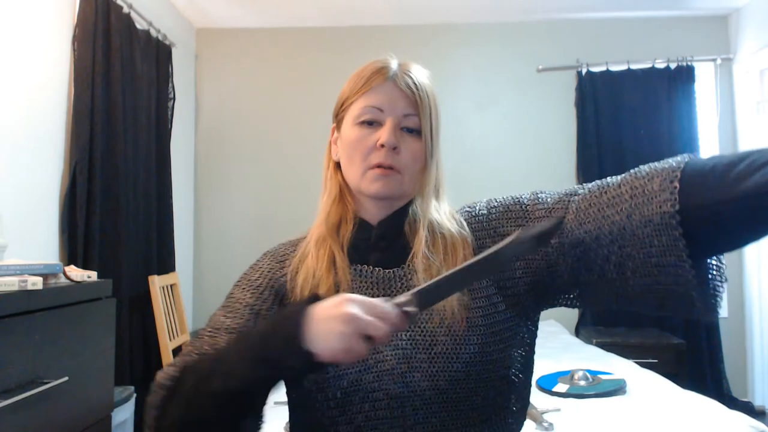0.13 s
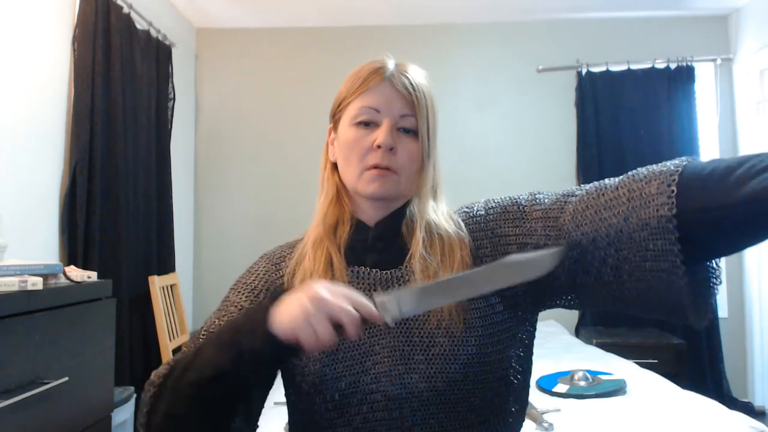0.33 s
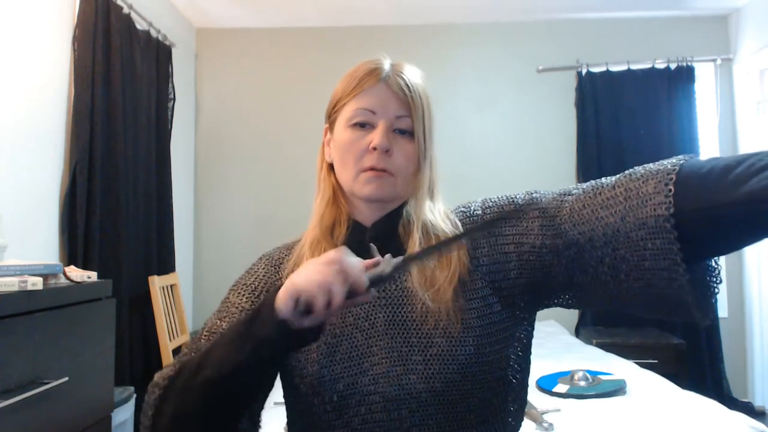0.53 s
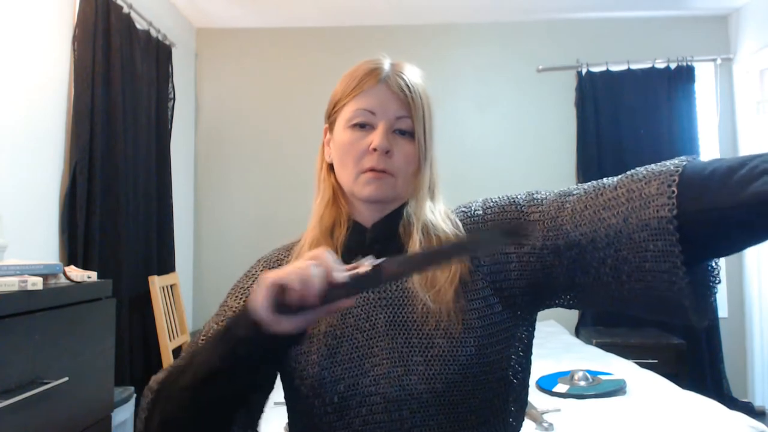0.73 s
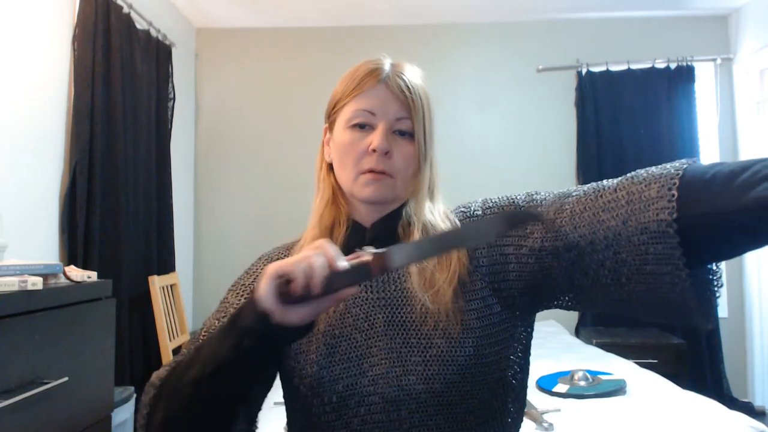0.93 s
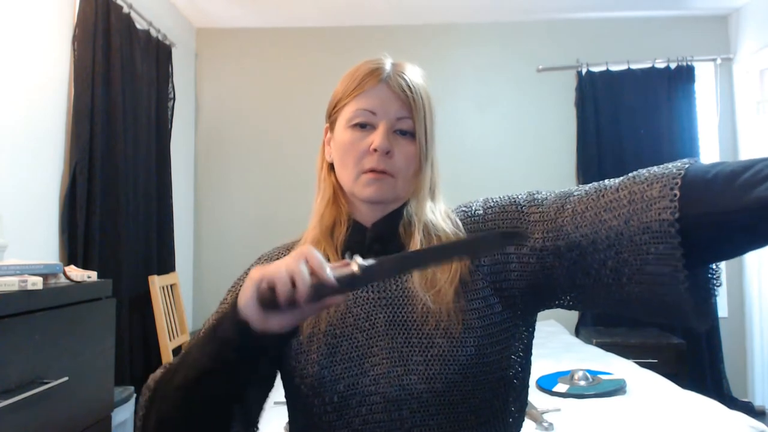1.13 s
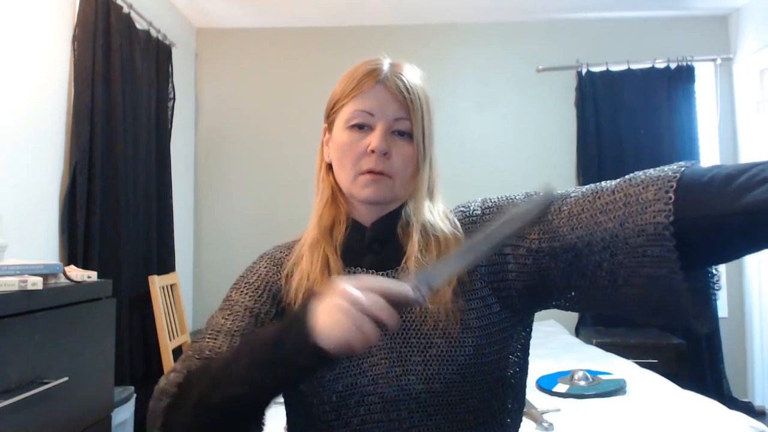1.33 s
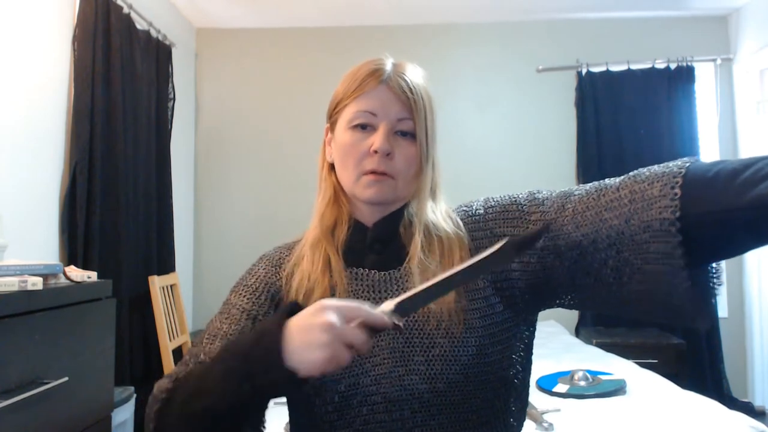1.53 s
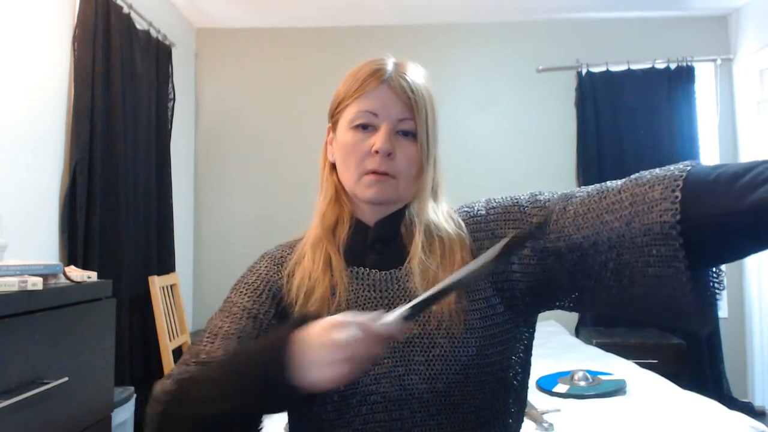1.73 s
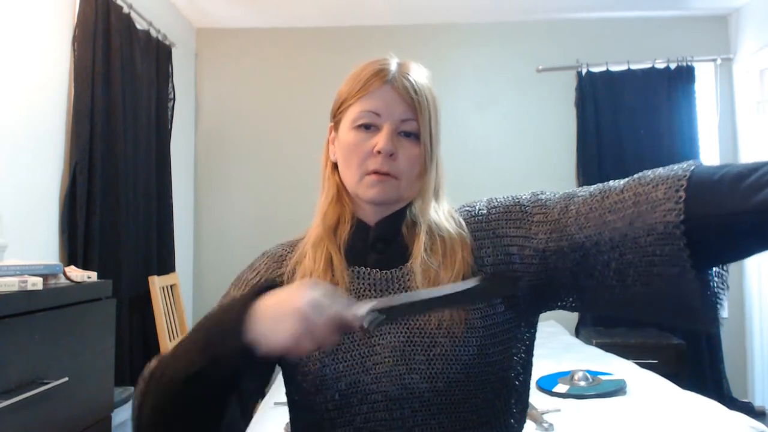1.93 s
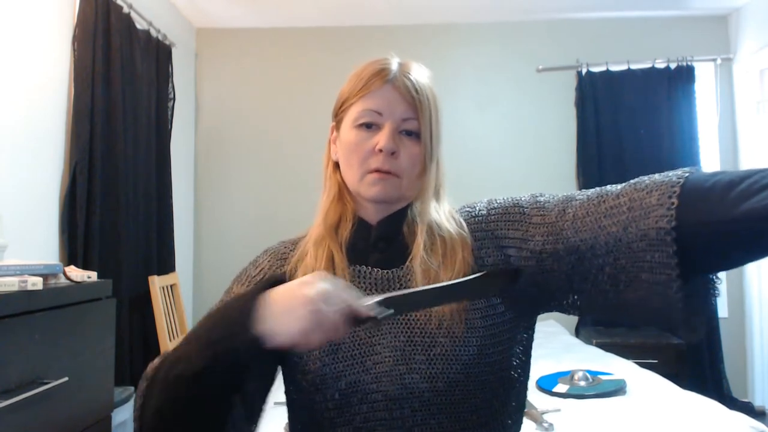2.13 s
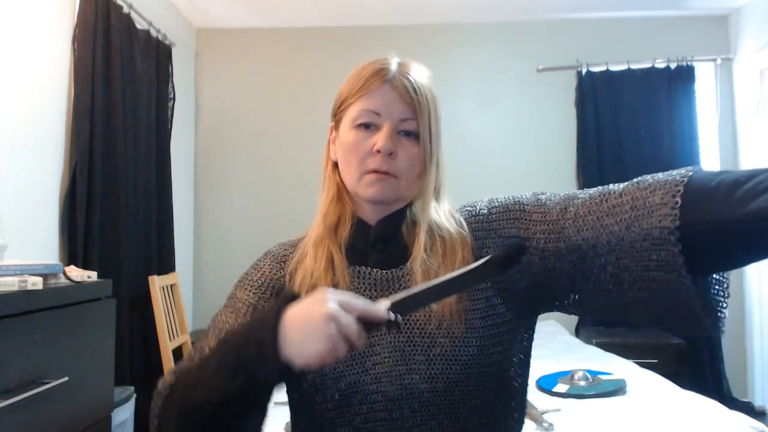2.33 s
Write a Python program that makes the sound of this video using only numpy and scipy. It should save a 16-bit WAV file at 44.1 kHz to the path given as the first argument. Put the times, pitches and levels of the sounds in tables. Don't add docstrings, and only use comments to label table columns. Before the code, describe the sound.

Repeated metallic scrapes of a blade over a chainmail sleeve, each beginning with a sharp clink and rasping over the rings, separated by short pauses; little bass, soft room echoes and low steady hum, small webcam microphone.

```python
import sys
import numpy as np
from scipy import signal
from scipy.fft import rfft, irfft
from scipy.io import wavfile

SR = 44100
rng = np.random.default_rng(int(sys.argv[2]) if len(sys.argv) > 2 else 0)


def master_out(mix):
    frames = np.transpose(np.atleast_2d(mix))
    ceiling = np.clip(frames, -1, 1)
    pcm = np.round(ceiling * 32767).astype(np.int16)
    wavfile.write(sys.argv[1], SR, pcm)


def volts_from_db(level):
    exponent = np.asarray(level, float) / 20
    return 10 ** exponent


N = 109676


def rms_one(x):
    return x / np.sqrt(np.mean(x ** 2) + 1e-20)


def coloured(x, points):
    hz, db = np.transpose(points)
    grid_hz = np.linspace(0, SR / 2, 4097)
    curve_db = np.interp(np.log(grid_hz + 1), np.log(hz), db)
    cepstrum = irfft(np.log(volts_from_db(curve_db)))
    cepstrum[1:4096] *= 2
    cepstrum[4097:] = 0
    impulse = irfft(np.exp(rfft(cepstrum)))
    return signal.fftconvolve(x, impulse)[:len(x)]


def resonance(x, hz, width_hz):
    r = np.exp(-np.pi * width_hz / SR)
    top = np.array([1, 0, -1]) * (1 - r * r) / 2
    return signal.lfilter(top, [1, -2 * r * np.cos(2 * np.pi * hz / SR), r * r], x + 1e-18)


def highpass(x, hz):
    return signal.sosfilt(signal.butter(2, hz, "high", fs=SR, output="sos"), x)


def drift(rate_hz):
    r = np.exp(-2 * np.pi * rate_hz / SR)
    wander = signal.lfilter([1], [1, -2 * r, r * r], rng.standard_normal(N + SR))
    return rms_one(wander[SR:])


def grains(per_s, spread_db):
    sizes = volts_from_db(spread_db * np.minimum(rng.exponential(1, N), 5)) * rng.choice([-1, 1], N)
    chosen = np.clip((per_s / SR - rng.random(N)) * 100, 0, 1)
    return rms_one(sizes * chosen)


def decaying_sine(t, start_s, hz, db, t60_s, rise_s, phase_s):
    fade = volts_from_db(db - 60 * np.abs(t - start_s) / t60_s)
    return fade * np.clip((t - start_s) / rise_s, 0, 1) * np.sin(2 * np.pi * hz * (t - phase_s))


# (pitch [Hz], level [dB per Hz])
HUM_TONE = [(12, 8), (20, 15.5), (134, -4), (367, 1), (513, -16.5), (624, -8.5), (1370, -9), (2320, -18),
            (16000, -26)]
# (pitch [Hz], width [Hz], level [dB])
DRONE_BANDS = [(124.3, 6.2, -79.5), (243.5, 1.47, -73), (306, 82, -70), (993, 24, -75.5), (1328, 62, -73.5)]


def hum():
    white = rng.standard_normal((2, N + SR))
    drone = sum(volts_from_db(db) * rms_one(resonance(white[1], hz, width)[SR:]) for hz, width, db in DRONE_BANDS)
    return volts_from_db(-64.5) * rms_one(coloured(white[0], HUM_TONE)[SR:]) + drone


# (time [s], level [dB])
STROKE_PRESSURE = [
    [(0, -42), (.03, -50), (.055, -49.5), (.075, -50), (.1, -50.5), (.13, -58)],
    [(.14, -58.5), (.17, -44.5), (.22, -50), (.24, -41.5), (.255, -72)],
    [(.565, -47), (.585, -45.5), (.63, -36), (.67, -31), (.695, -39), (.725, -72)],
    [(.925, -57), (.94, -42.5), (.955, -38), (.975, -37.5), (1.0, -47), (1.03, -63)],
    [(1.255, -43.5), (1.3, -49), (1.34, -45), (1.39, -47), (1.415, -39.5), (1.445, -43.5), (1.47, -58)],
    [(1.575, -47), (1.61, -44), (1.645, -39.5), (1.66, -34), (1.715, -36), (1.73, -44.5), (1.75, -63)],
    [(1.86, -44), (1.9, -56.5), (2.0, -60.5), (2.04, -50.5), (2.065, -58)],
    [(2.07, -56.5), (2.105, -44.5), (2.12, -44.5), (2.14, -46), (2.17, -40), (2.2, -57), (2.24, -62)],
    [(2.305, -57), (2.325, -53), (2.33, -46.5), (2.375, -39.5), (2.385, -60), (2.39, -64)],
    [(2.405, -73), (2.415, -49), (2.44, -43), (2.455, -54.5), (2.487, -57)],
]


def scrape():
    clicks_per_s, click_spread_db = 5200, 3.5
    clump_db, clumps_per_s, scrape_db = -1.5, 53, -3.5
    t, pressure = np.arange(N) / SR, np.zeros(N)
    for stroke in STROKE_PRESSURE:
        s, db = np.transpose(stroke)
        touching = np.clip(np.minimum(t - s[0] + 0.0006, s[-1] - t) / 0.0015, 0, 1)
        pressure += touching * volts_from_db(np.interp(t, s, db))
    clumps = volts_from_db(scrape_db + clump_db * drift(clumps_per_s))
    return clumps * pressure * grains(clicks_per_s, click_spread_db)


def links(clicks):
    low_hz, high_hz, ring_cycles, ring_share = 3550, 14600, 1.7, 0.11
    dealt = rng.integers(0, 16, N)
    rung = 0
    for k, hz in enumerate(np.geomspace(low_hz, high_hz, 16)):
        rung = rung + volts_from_db(2.3 * drift(26)) * resonance(clicks * (dealt == k), hz, hz / ring_cycles)
    match = np.sqrt(np.mean(clicks ** 2) / np.mean(rung ** 2))
    return (1 - ring_share) * clicks + ring_share * rung * match


# (pitch [Hz], level [dB per Hz])
MAIL_TONE = [(600, -50.5), (1200, -20), (3000, -11), (4200, 1.5), (6500, 3), (7400, -1), (10500, -4),
             (16000, -10.5)]


def mail(force):
    unit = np.sqrt(np.mean(coloured(rng.standard_normal(SR), MAIL_TONE) ** 2))
    return coloured(force, MAIL_TONE) / unit


# (pitch [Hz], level [dB], time to fall 60 dB [s])
BLADE_MODES = [(2490, -20, .07), (2790, -14, .08), (3385, -13, .1), (4400, 0, .04), (5230, -1, .04),
               (5670, -1, .045), (6500, -2, .04), (6590, -4, .04), (7790, -9, .05), (8550, -9, .04),
               (8860, -11, .04), (9400, -9, .05), (10300, -11, .035), (11450, -11, .035)]
# (time [s], level [dB])
BLADE_FREEDOM = [(0, -7), (.2, -6), (.45, -11), (.66, -10), (.85, -10), (.98, -4), (1.3, -3), (1.53, -5),
                 (1.75, -2), (1.93, -11.5), (2.12, -4), (2.17, -11), (2.49, -8)]


def blade(force):
    blade_db, sway_db, sway_hz, split = -28, 3.5, 9.4, 0.006
    free_force = force * volts_from_db(np.interp(np.arange(N) / SR, *np.transpose(BLADE_FREEDOM)))
    out = 0
    for hz, db, t60_s in BLADE_MODES:
        r = volts_from_db(-60 / (t60_s * SR))
        drive = free_force * volts_from_db(db + sway_db * drift(sway_hz)) + 1e-18
        for w in 2 * np.pi * hz / SR * np.array([1 - split / 2, 1 + split / 2]):
            out = out + signal.lfilter([0, np.sin(w)], [1, -2 * r * np.cos(w), r * r], drive)
    return volts_from_db(blade_db) * out


# (time [s], peak [dB], ring pitch [Hz], brightness [dB])
RING_CATCHES = [(0.0668, -31, 5030, -3), (0.073, -30, 5000, -7), (0.1856, -25, 5700, 0),
                (0.2073, -31, 4340, -6), (0.2157, -28, 4470, -3), (0.2393, -37, 4370, -3),
                (0.4638, -18, 5700, 7), (0.576, -24, 4850, -16), (0.5917, -23, 4500, -3),
                (0.6016, -14, 4300, -1), (0.61, -12, 5600, -1), (0.6154, -11.5, 4300, 6.5),
                (0.6267, -14.5, 5400, -12), (0.6316, -13.5, 5150, 4), (0.6457, -7.5, 4130, 6),
                (0.655, -18.5, 5840, 8), (0.6694, -25, 6370, -10), (0.682, -9.5, 4100, 0),
                (0.8548, -25, 5100, 15), (0.9519, -29, 6800, 8), (0.9797, -16, 4360, 4.5),
                (0.99, -28.5, 5260, -7),
                (1.247,-22,6700,-4), (1.2556,-29.5,5500,18), (1.259,-38,10200,6), (1.3386,-27,5430,4),
                 (1.356,-29,5470,-5), (1.387,-28,4320,-13), (1.4027,-29,4400,-4), (1.4071,-37,6500,12),
                 (1.4125,-29.5,5650,19), (1.4158,-34,6800,0), (1.451,-34,6800,-8), (1.563,-36,4630,14),
                 (1.5835,-32,6700,-1), (1.6373,-23.5,5630,-4), (1.6599,-16.5,6700,-7),
                 (1.6811,-19,5900,-12), (1.6845,-18.5,5700,-6), (1.6853,-33,5240,-10), (1.6965,-14,5240,8),
                 (1.731,-27,6550,-4), (1.8648,-26,5600,2), (1.873,-28.5,4500,12.5), (2.016,-28,4420,-8),
                 (2.0315,-39,5100,10), (2.075,-31.5,4550,-7), (2.083,-31,6330,-3), (2.0946,-26,6350,-4),
                 (2.147,-22,6700,9), (2.1564,-17,6100,7.5), (2.1614,-16,4900,4), (2.3332,-26.5,5050,-7),
                 (2.365,-40,6300,-6), (2.3794,-29,4440,-9), (2.416,-28.5,5760,10), (2.42,-29,5800,-7)]
# (time [s], peak [dB], ring pitch [Hz], sleeve share [dB], brightness [dB])
BLADE_LANDINGS = [(0.1829, -38.5, 5400, -2, -6), (0.2346, -42, 4400, -15, -6),
                  (0.4597, -9.5, 4500, -35.5, 3.5), (0.8494, -14, 4350, -32.5, 8.5),
                  (0.9488, -20, 5500, -17.5, 14), (1.2452, -24, 5340, -22, 15.5),
                  (1.2850, -37, 4300, -11.5, 18), (1.4004, -20, 6800, -51, 6), (1.5272, -37, 5650, -40, 17),
                  (1.5691, -16, 5600, -33, 6.5), (1.8548, -17, 5800, -42, 2.5),
                  (1.9356, -16.5, 5030, -22.5, -12), (2.0143, -33.5, 4770, -29, -16),
                  (2.1092, -22.5, 5600, -62, -9), (2.1294, -24.5, 6300, -54, 4),
                  (2.3270, -28, 6100, -52, 4.5), (2.3730, -24, 6350, -60, 5),
                  (2.4420, -26.5, 4600, -23.5, 7)]


def hits():
    landing_t60_s, catch_t60_s, first_t60_s, sleeve_t60_s = 0.032, 0.011, 0.005, 0.13
    hit_db, rattle_db, sleeve_hit_db, catch_sleeve_db = 3, -8, 2, -36.5
    rise_s, tick, bright_hz = 0.00055, 0.65, 7400
    ring_width_hz, ring_share, overtone_hz, overtone_share = 1043, 0.46, 9300, 0.33
    length = 4000
    t, top = np.arange(length) / SR, int(rise_s * SR)
    clicks, pushes = np.zeros((2, N + SR))
    rattle = grains(14740, spread_db=1.5)
    catches = [(s, db, hz, catch_sleeve_db, bright_db)
               for s, db, hz, bright_db in RING_CATCHES]
    for events, t60_s in ((BLADE_LANDINGS, landing_t60_s), (catches, catch_t60_s)):
        for s, db, hz, sleeve_db, bright_db in events:
            i = int(s * SR)
            shake = np.roll(rattle, -i)[:length] / 3 * np.minimum(t / rise_s, 1)
            shake = shake / 3 / np.sqrt(np.mean(shake[top:3 * top] ** 2) + 1e-4)
            burst = volts_from_db(rattle_db) * (volts_from_db(-60 * t / t60_s) + volts_from_db(-60 * t / first_t60_s)) * shake
            burst[top] = tick
            high = highpass(burst, bright_hz)
            low = (1 - ring_share) * (burst - high) + ring_share * 3 * resonance(burst, hz, ring_width_hz)
            high = (1 - ring_share) * high + overtone_share * resonance(burst, overtone_hz, ring_width_hz)
            clicks[i:i + length] += volts_from_db(db + hit_db) * (low + volts_from_db(bright_db) * high)
            push_db = db + sleeve_db + sleeve_hit_db - 60 * t / sleeve_t60_s
            pushes[i:i + length] += volts_from_db(push_db) * shake * 10
    return clicks[:N], pushes[:N]


# (pitch [Hz], width [Hz], level [dB])
SLEEVE_BODY = [(300, 37, -7.5), (542.5, 10.3, -3.5), (1027, 81, -5.5), (1248, 137, -4.5)]


def sleeve(push):
    body = sum(volts_from_db(db) * resonance(push, hz, width) for hz, width, db in SLEEVE_BODY)
    return highpass(body, 220)


# (time [s], peak [dB], pitch [Hz])
ARM_THUDS = [
    (.184, -48.5, 535),
    (.612, -45.5, 300),
    (1.9356, -42.5, 522),
    (1.9356, -43, 300),
]


def thuds():
    t = np.arange(N) / SR
    return sum(decaying_sine(t, s, hz, db, t60_s=0.037, rise_s=0.0013, phase_s=s) for s, db, hz in ARM_THUDS)


# (time [s], pitch [Hz], peak [dB], time to fall 60 dB [s])
BLADE_PINGS = [(0.234, 4400, -40, .09), (.236, 10100, -56, .15), (.69, 3391, -56, .16),
               (.69, 6525, -52, .2), (.69, 8120, -56, .2), (.69, 9367, -58, .2), (.69, 11220, -58, .15),
               (.968, 5240, -39, .1), (0.99, 4395, -35, .09), (1.0, 3386, -56, .16), (1.0, 7822, -54, .14),
               (1.04, 9370, -55, .08), (1.401, 4410, -38, .1), (1.401, 6500, -40, .08),
               (1.41, 5640, -42, .1), (1.527, 5640, -40, .14), (1.527, 4420, -43, .12),
               (1.527, 5260, -47, .12), (1.705, 2790, -50, .07), (1.74, 2790, -63, .5),
               (1.76, 3390, -68, .6), (1.76, 5700, -64, .5), (1.856, 6520, -38, .06),
               (2.108, 4400, -42, .1), (2.11, 6530, -36, .05), (2.118, 6530, -32, .04),
               (2.13, 6510, -33, .035), (2.146, 6480, -32, .03)]


def pings():
    t, waver = np.arange(N) / SR, volts_from_db(2 * drift(51))
    return waver * sum(decaying_sine(t, s, hz, db, t60_s, rise_s=0.00053, phase_s=0)
                       for s, hz, db, t60_s in BLADE_PINGS)


def room(x):
    room_db, t60_s, wall_cut_hz = -12.5, 0.26, 22000
    t = np.arange(SR // 2) / SR
    noise = rng.standard_normal((2, len(t))) * np.clip((t - 0.003) / 0.016, 0, 1)
    low = signal.sosfilt(signal.butter(2, wall_cut_hz, fs=SR, output="sos"), noise[0])
    high = highpass(noise[1], wall_cut_hz)
    tail = low * volts_from_db(-60 * t / t60_s) + high * volts_from_db(-60 * t / (0.66 * t60_s))
    return volts_from_db(room_db) * signal.fftconvolve(x, tail / np.sqrt(np.sum(tail ** 2)))[:N]


def scene():
    clicks, pushes = hits()
    drag = scrape()
    force = links(drag) + clicks
    body = sleeve(pushes + volts_from_db(-18) * drag)
    near = mail(force) + blade(force) + pings() + thuds() + body
    return (near + room(near) + hum())[None]


# (start [s], end [s], threshold [dB])
FAINT_GAPS = [
    (.727, .738, -84),
    (1.814, 1.848, -85),
]


def thin_out(z, hz, t):
    for start, end, floor_db in FAINT_GAPS:
        span = (t > start) & (t < end)
        strength = np.abs(z[..., span]) * np.minimum(hz[:, None] / 4000, 1)
        z[..., span] *= (strength > volts_from_db(floor_db)) | (hz[:, None] < 380)
    return z


def roll_off(x):
    return signal.sosfilt(signal.butter(12, 16830, fs=SR, output="sos"), x)


def record(dry):
    hz, t, z = signal.stft(dry, SR, nperseg=512, noverlap=448)
    z = thin_out(z, hz, t)
    z[:, hz > 15900] *= volts_from_db(-32)
    mix = signal.istft(z, SR, nperseg=512, noverlap=448)[1][:, :N]
    mix = mix * np.clip((N - 40 - np.arange(N)) / 60, 0, 1)
    return roll_off(mix)


dry = scene()
out = record(dry)
master_out(out)
```